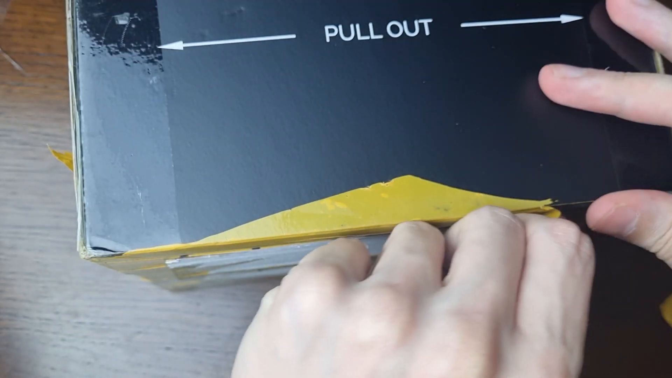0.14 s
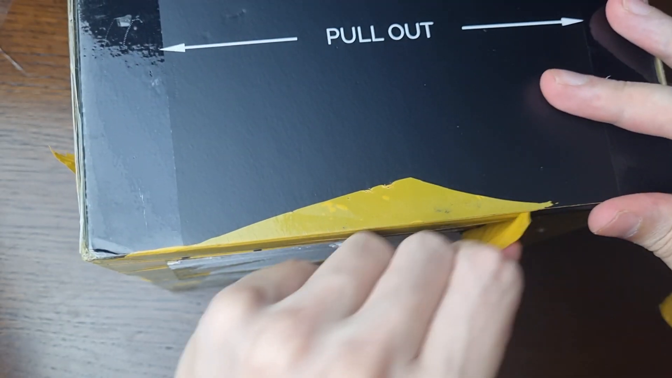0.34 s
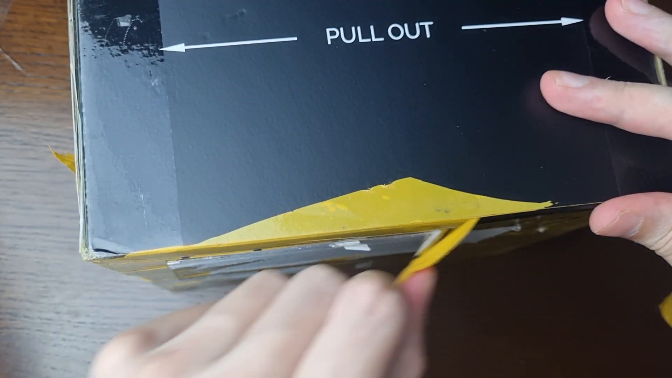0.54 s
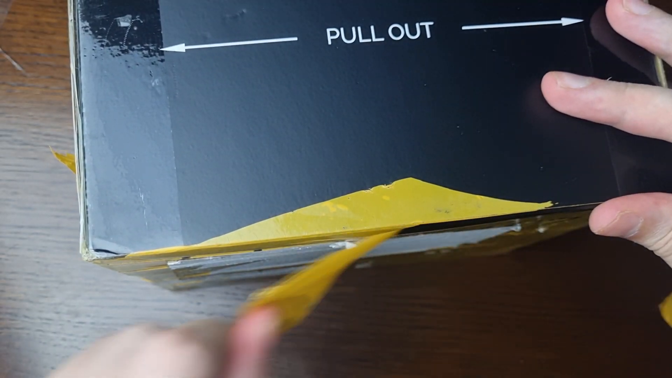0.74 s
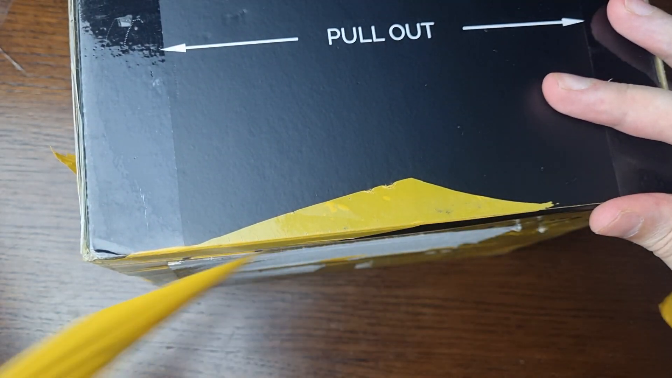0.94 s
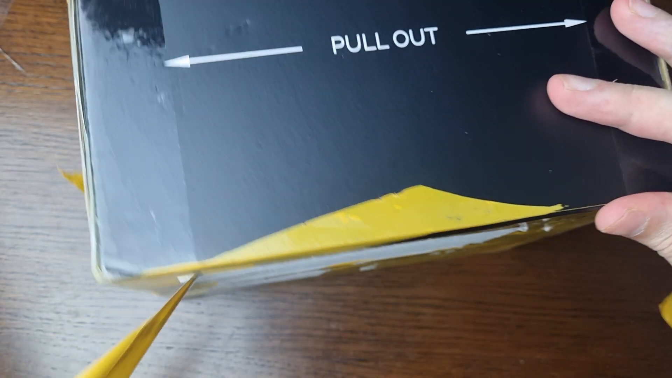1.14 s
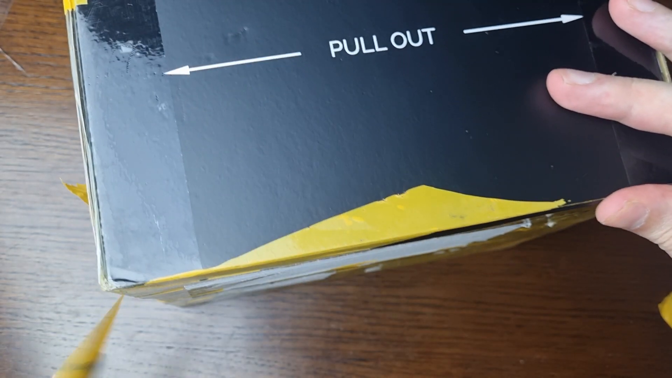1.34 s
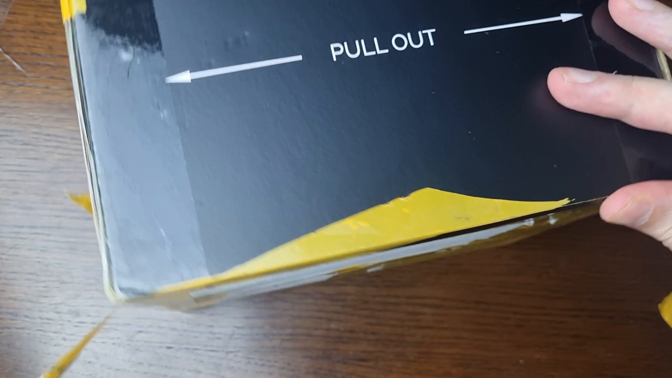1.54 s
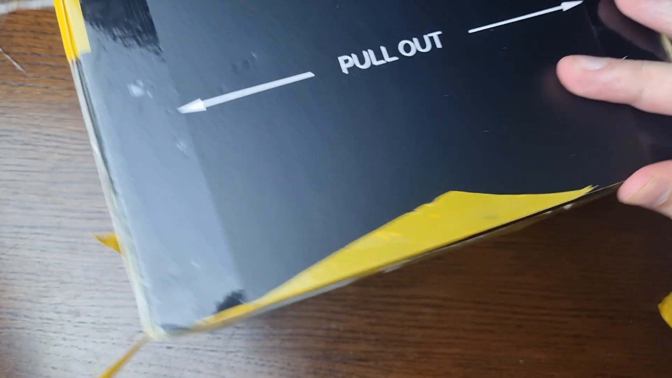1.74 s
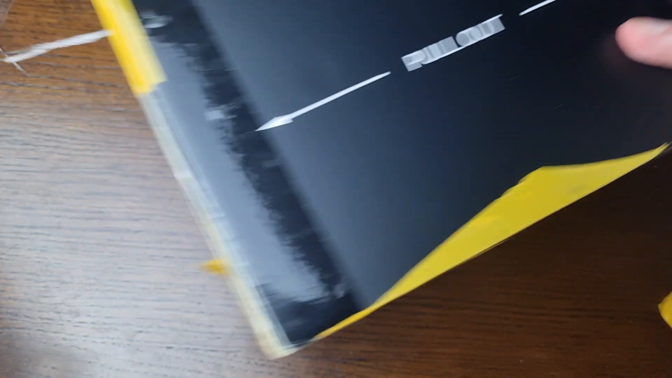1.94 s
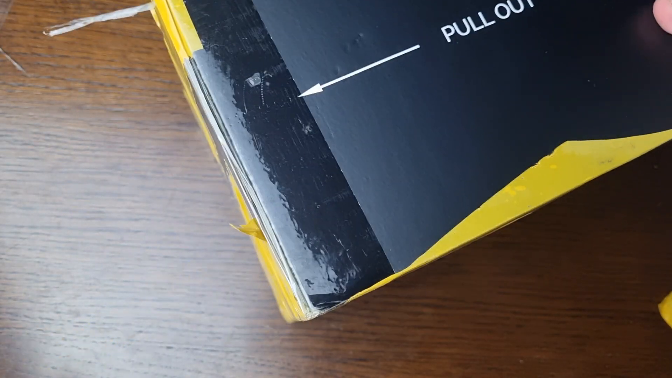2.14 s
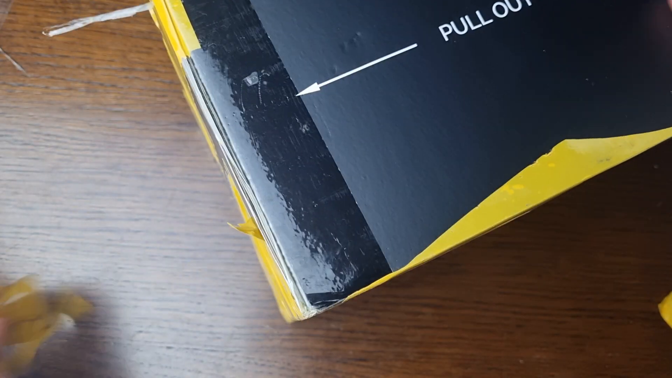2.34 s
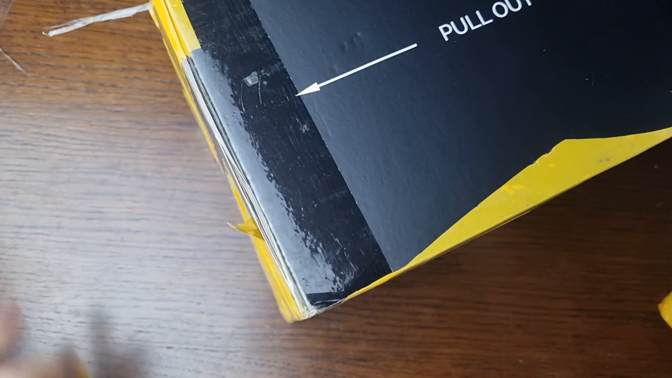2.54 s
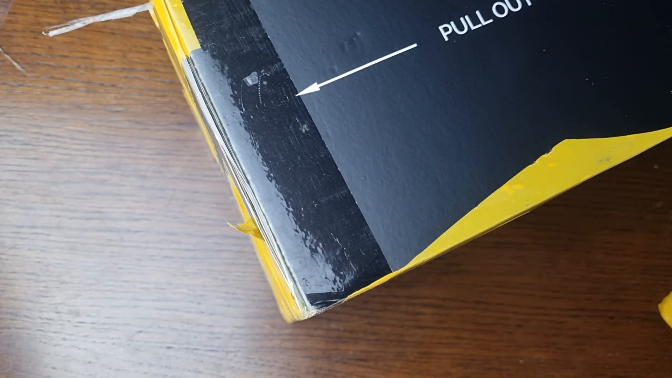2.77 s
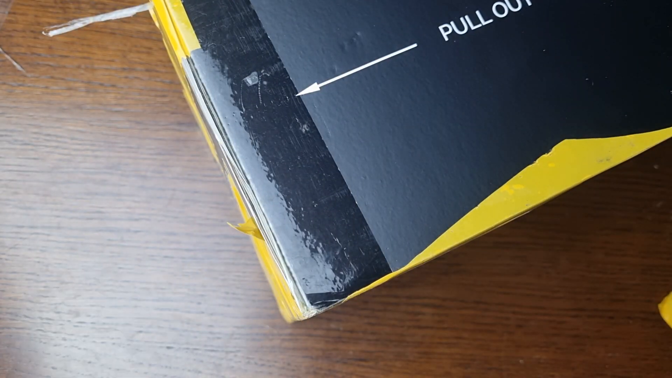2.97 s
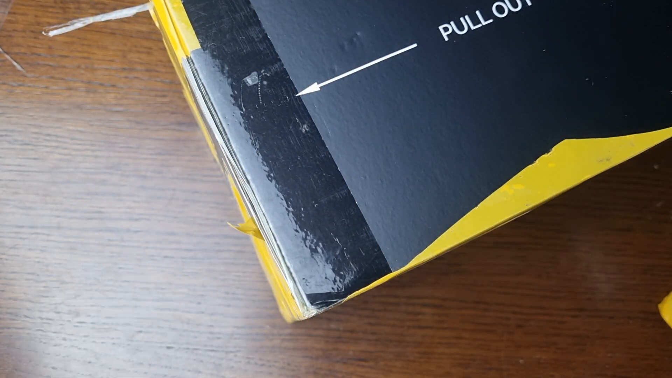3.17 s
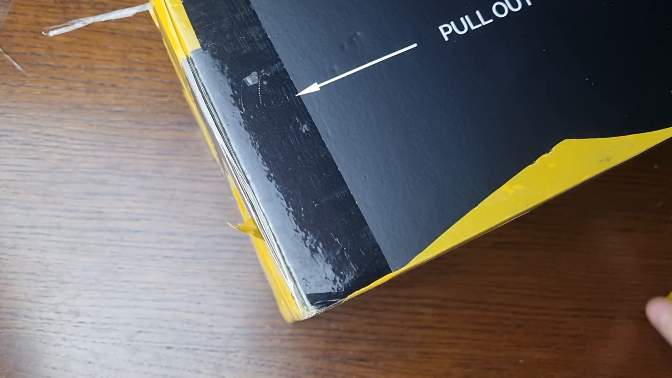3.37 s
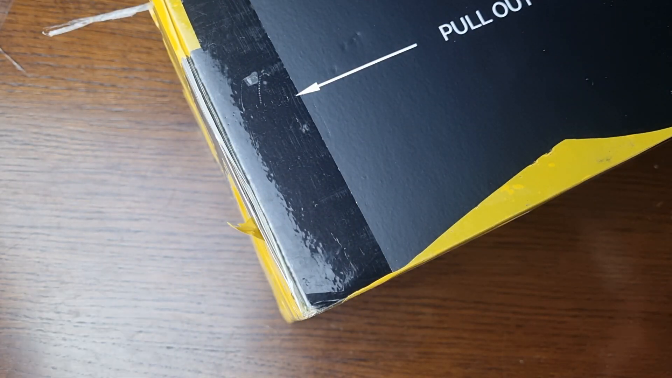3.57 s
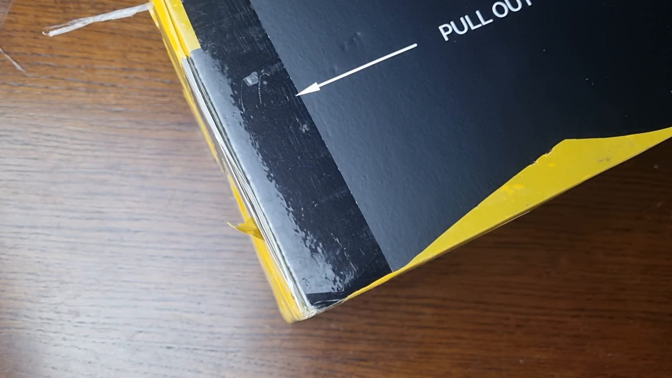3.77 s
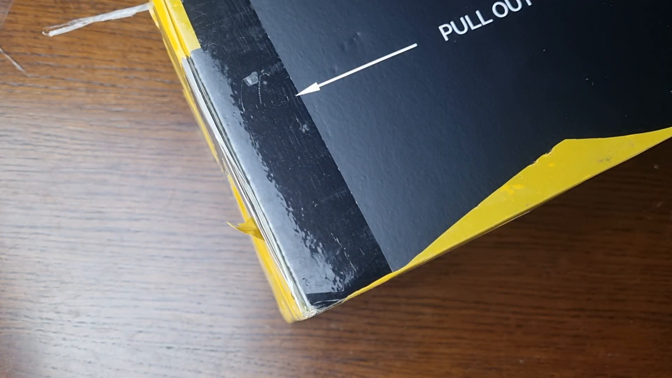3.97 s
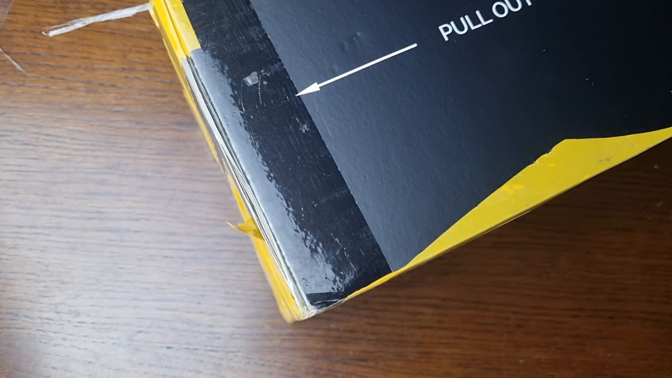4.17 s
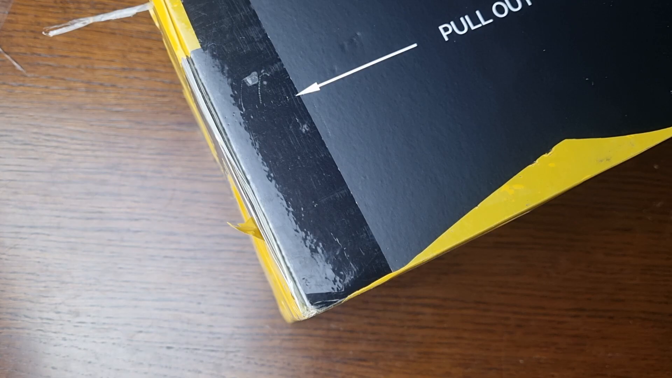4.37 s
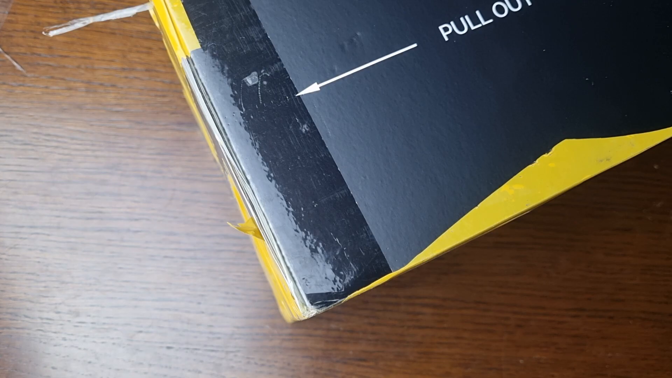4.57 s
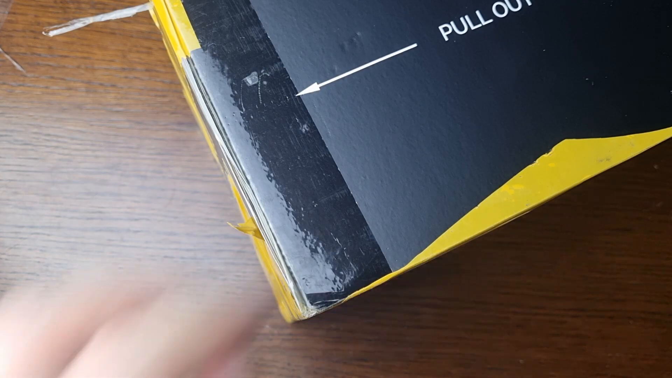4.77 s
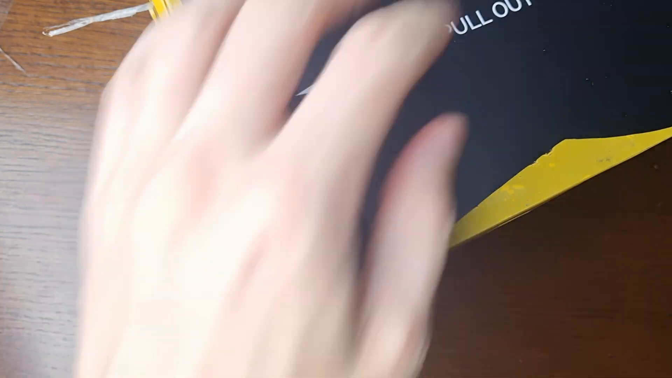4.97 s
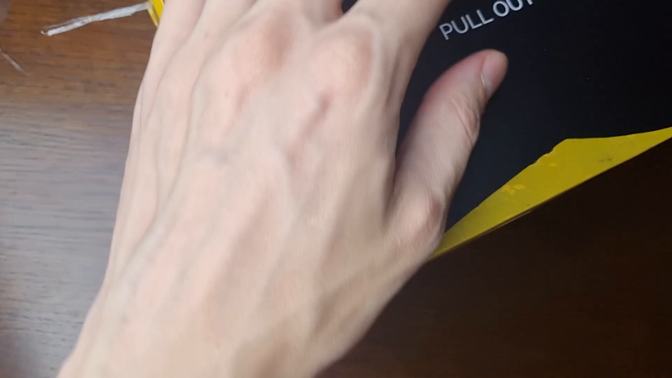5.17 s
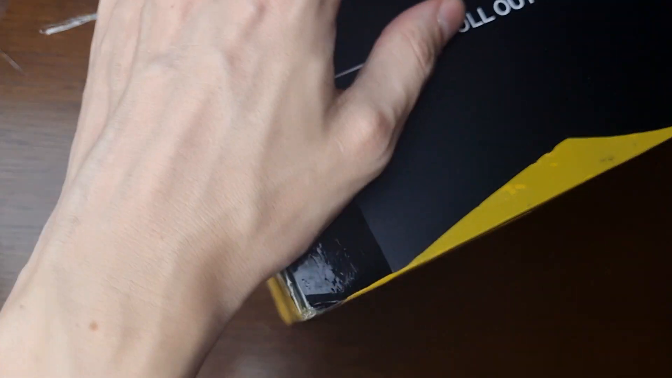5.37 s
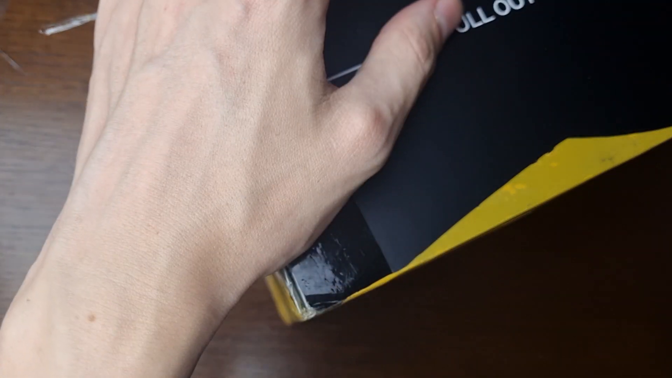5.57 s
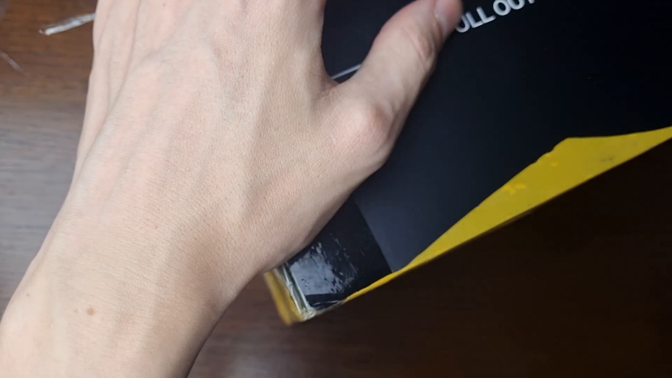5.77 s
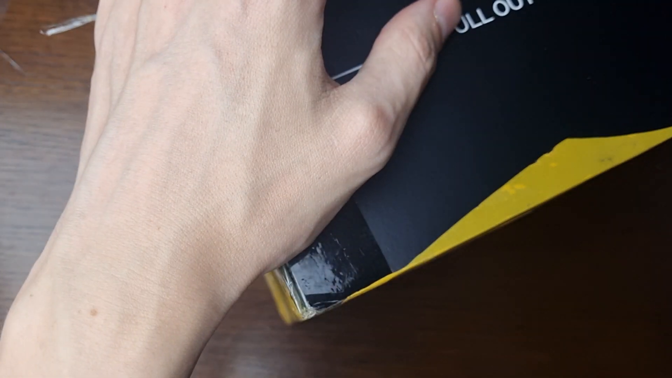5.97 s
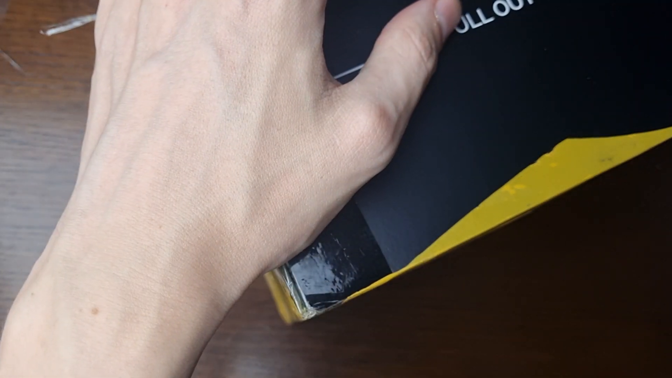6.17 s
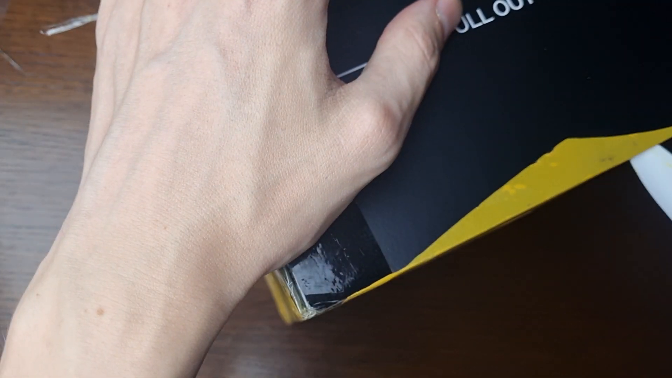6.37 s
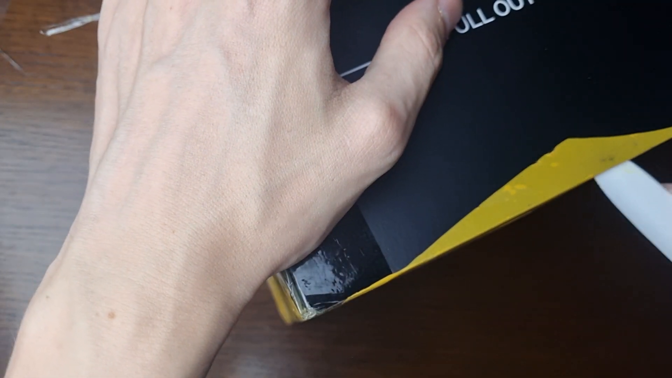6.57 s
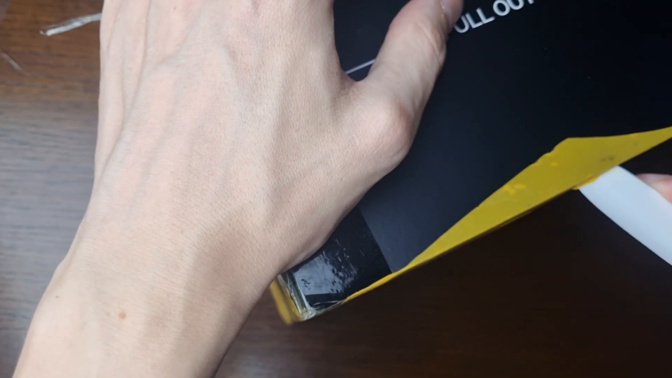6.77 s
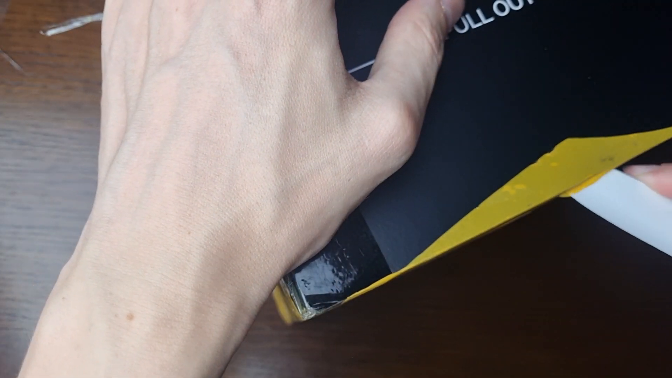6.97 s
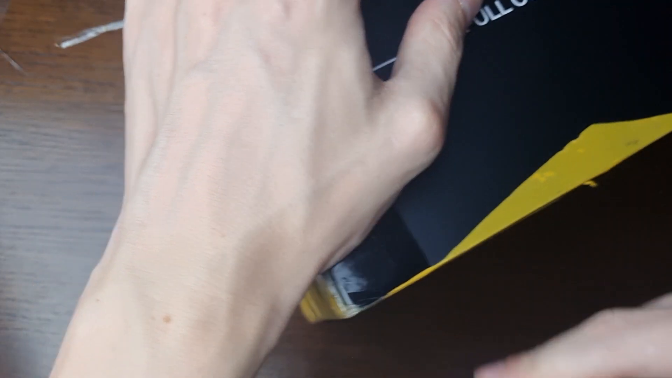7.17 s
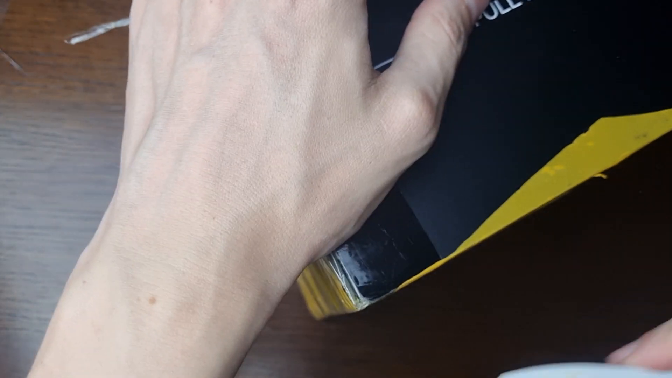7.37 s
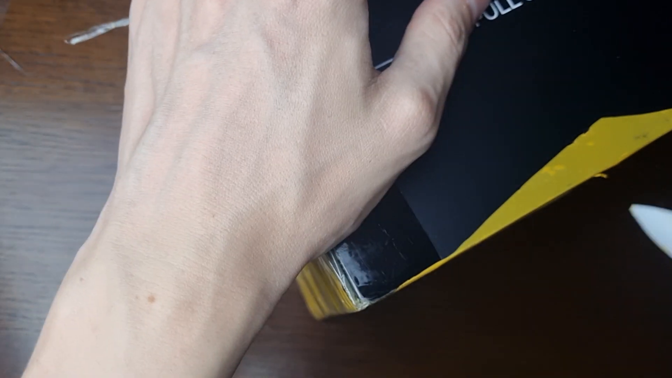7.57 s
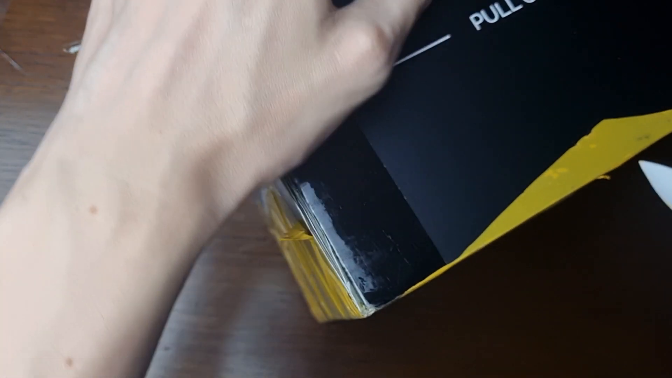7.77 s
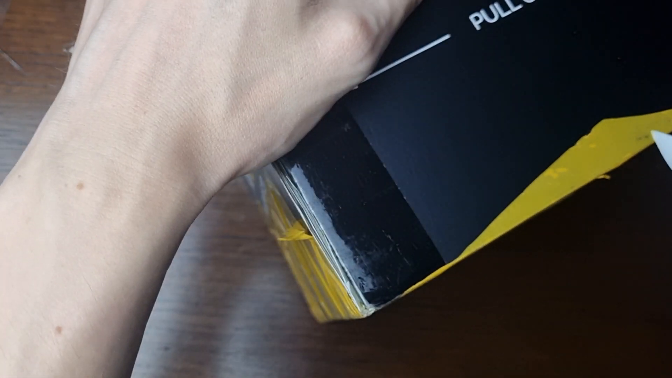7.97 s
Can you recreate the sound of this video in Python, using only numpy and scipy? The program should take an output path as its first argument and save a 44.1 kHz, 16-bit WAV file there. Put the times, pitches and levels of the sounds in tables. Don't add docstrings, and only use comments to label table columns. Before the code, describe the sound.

Very close stereo sound at a wooden desk in a small, quiet room. After a tiny crackle at 0.1 s, tape begins peeling from a hollow cardboard box around 0.25 s: dense hiss, a sharp snap near 0.4, quick stuttering slips at 0.5, and boxy midrange resonance, strongest around 0.8 to 1.0 with a hard crack. The pull eases; isolated snaps come at 1.25, 1.4 and 1.55 to 1.6. At 1.82 to 1.91 the tape rips free in a loud, rapid burst with a low thump. Light crinkles follow from 2.2 to 2.5, with brighter clicks at 3.05 to 3.2 and 3.4. Then near silence, with only faint ticks and soft desk rumble. Around 5.0 to 5.4 a hand slides with a very faint, high squeak and creaks. Soft scraping and dull knocks run from 6.2 to 7.0; a crisp, rising blade cut snaps at 7.12 to 7.15, then faint rustles and bumps until 8.

```python
import sys
import numpy as np
from scipy import signal
from scipy.fft import rfft, irfft, next_fast_len
from scipy.io import wavfile
from scipy.ndimage import uniform_filter1d, map_coordinates

SR = 44100
rng = np.random.default_rng(int(sys.argv[2]) if len(sys.argv) > 2 else 0)


def to_linear_factor(level_db):
    exponent = np.asarray(level_db, float) / 20
    return 10 ** exponent


def generate_wav(sig):
    pcm = np.round(np.clip(np.atleast_2d(sig).T, -1, 1) * 32767).astype(np.int16)
    wavfile.write(sys.argv[1], SR, pcm)


N = 353241

# (frequency [Hz], bandwidth [Hz], level [dB])
BOX_MODES = [(310, 60, 1.5), (553, 140, -3), (923, 110, -3), (1204, 230, -6.5), (1406, 120, -4),
             (1680, 210, -11)]
# (frequency [Hz], level [dB])
FILM_SPECTRUM = [(300, -27), (1200, -10.5), (2200, -2.5), (4400, 1), (7600, 1.5), (11300, -2), (14600, 0.5),
                 (16200, -9)]
# (time [s], delay of the right side [samples], left over right [dB])
HANDS = [(0, -5.5, 1), (0.701, 11.5, -1), (1.299, 10, 2), (1.851, 12, 3.5), (2.301, 11, -0.5),
         (3.2, 9.5, 1), (3.699, -6.5, -4.5), (4.201, -4, -11.5), (5.201, -11, -12), (6.2, 0.5, -2.5),
         (6.598, -2.5, -3), (8, 5.5, -3)]


def evened(x):
    return x / np.sqrt(np.mean(x ** 2) + 1e-20)


def read(points, hz):
    f, value = np.transpose(points)
    return np.interp(np.log(hz + 1), np.log(f + 1), value)


def colour(x, points, tilt_db=0):
    size = next_fast_len(x.shape[-1])
    hz = np.fft.rfftfreq(size, 1 / SR)
    gain = to_linear_factor(read(points, hz) + tilt_db * np.log2((hz + 300) / 5000))
    return irfft(rfft(x, size) * gain, size)[..., :x.shape[-1]]


def resonate(x, hz, width):
    r = np.exp(-np.pi * width / SR)
    return 2 * signal.lfilter([1 - r], [1, -r * np.exp(2j * np.pi * hz / SR)], x).real


def resonate_twice(x, hz, width):
    return resonate(resonate(x, hz, width), hz, width)


def box(x, modes=BOX_MODES):
    return sum((-1) ** k * to_linear_factor(db) * resonate(x, hz, w) for k, (hz, w, db) in enumerate(modes))


def curve(table, column, outside=-120.):
    t, table = np.arange(N) / SR, np.asarray(table)
    out = np.full(N, outside)
    inside = (t >= table[0, 0]) & (t <= table[-1, 0])
    out[inside] = np.interp(t[inside], table[:, 0], table[:, column])
    return uniform_filter1d(out, size=200)


def swells(peak_s, rise_s, fall_s, db, roundness=1):
    t = np.arange(0, N + 32, 32)[:, None] / SR
    rising = (peak_s - t) / np.maximum(rise_s, .003)
    falling = (t - peak_s) / np.maximum(fall_s, .003)
    gains = to_linear_factor(db - 20 * np.maximum(rising, falling) ** roundness)
    return np.interp(np.arange(N) / SR, t[:, 0], np.sqrt((gains ** 2).sum(1)))


def add(mix, s, sound):
    part = mix[..., round(s * SR):][..., :sound.shape[-1]]
    part += sound[..., :part.shape[-1]]


def lean():
    s, _, db = np.transpose(HANDS)
    return to_linear_factor(np.array([[.5], [-.5]]) * np.interp(np.arange(N) / SR, s, db))


def hush():
    # (frequency [Hz], level [dB per Hz])
    air = [(30, 16), (220, -3), (480, -1), (950, -21.5), (1400, -8.5), (2000, -16.5), (8000, -24.5),
           (16000, -21)]
    a, b = rng.standard_normal((2, N))
    return to_linear_factor(-81) * evened(colour(np.array([a, 1.8 * a + 1.5 * b]), [(7.8, -31)] + air))


def room(x):
    # (frequency [Hz], reverberation time t60 [s])
    decay = [(150, .4), (500, .5), (3000, .52), (8000, .44), (15000, .27)]
    taps = np.zeros((2, SR))
    at = np.arange(200, SR - 20, 20) + rng.integers(0, 20, (2, (SR - 201) // 20))
    np.put_along_axis(taps, at, rng.choice([-1., 1.], at.shape), 1)
    hz, t, z = signal.stft(taps, SR, nperseg=256)
    tail = signal.istft(z * to_linear_factor(-60 * t / read(decay, hz)[:, None]), SR, nperseg=256)[1]
    wet = signal.fftconvolve(x[None], tail / np.linalg.norm(tail[0]), axes=1)[:, :N]
    wet = signal.stft(wet, nperseg=256)[2]
    power = uniform_filter1d(abs(wet[:, 12:]) ** 2, size=24, axis=2) + 1e-20
    wet[:, 12:] *= np.sqrt(abs(uniform_filter1d(power, size=13, axis=1) / power))
    return signal.istft(wet, nperseg=256)[1][:, :N]


def rumble(strain):
    # (frequency [Hz], bandwidth [Hz])
    desk = [(66, 20), (97, 9.8), (142, 44), (180, 32)]
    # (peak time [s], length [s], deep level [dB], upper level [dB])
    leans = [(0.074, 0.67, -60, -77), (0.368, 0.3, -50.5, -47.5), (1.166, 0.15, -57, -50.5),
             (1.602, 0.21, -51.5, -58), (1.869, 0.15, -41.5, -40.5), (2.385, 0.45, -66.5, -80),
             (3.04, 0.74, -63, -94), (3.391, 0.18, -47.5, -54), (3.875, 0.32, -64.5, -91.5),
             (4.32, 0.16, -60, -84), (4.762, 0.39, -53.5, -77), (5.15, 0.45, -59, -71.5),
             (5.596, 0.21, -64, -71.5), (6.011, 0.13, -75.5, -59), (6.089, 0.24, -58.5, -70),
             (6.55, 0.64, -72, -69.5), (6.85, 0.21, -58, -72.5), (7.131, 0.15, -61, -49.5),
             (7.67, 0.15, -73, -63), (7.809, 0.099, -68, -64)]
    a, b = rng.standard_normal((2, N))
    push = np.array([a, .9 * a + .4 * b])
    modes = [resonate_twice(push, hz, width) for hz, width in desk]
    steady = [m / np.sqrt(uniform_filter1d(m ** 2, size=3000) + 0.3 * m.var()) for m in modes]
    deep, second, low, upper = steady
    lumps = to_linear_factor(4.5 * evened(uniform_filter1d(uniform_filter1d(a[::-1], size=2500), size=2500)))
    worked = np.minimum(to_linear_factor(-16.5) * strain, to_linear_factor(-51.0))
    s, length, deep_db, upper_db = np.transpose(leans)
    heave, shake = (swells(s, 0.25 * length, 0.56 * length, db, roundness=1.1) for db in (deep_db, upper_db))
    bass = (heave + to_linear_factor(-71.5) * lumps[::-1]) * (deep + to_linear_factor(-13) * second) + worked * second
    return bass + ((shake + to_linear_factor(-77.0)) * lumps + to_linear_factor(-1.5) * worked) * (0.83 * low + upper)


def squeak():
    # (time [s], frequency [Hz], level [dB])
    whistle = [
        (4.94, 11730, -103),
        (5.0, 12400, -78),
        (5.03, 12950, -91),
        (5.07, 12700, -73),
        (5.2, 12500, -86),
        (5.27, 12900, -86),
        (5.31, 13350, -81.5),
        (5.34, 12660, -90.5),
        (5.385, 11050, -91.5),
    ]
    waver = 1 + 0.003 * evened(uniform_filter1d(rng.standard_normal(N), size=150))
    hz = curve(whistle, 1, outside=11200.) * waver
    gain = to_linear_factor(curve(whistle, 2) + [[2], [-3]])
    return np.sqrt(2) * gain * np.sin(2 * np.pi * np.cumsum(hz) / SR)


def creaks():
    # (start time [s], length [s], level [dB])
    palm = [
        (5.047, 0.037, -88.5),
        (5.155, 0.034, -82),
        (5.231, .025, -76),
        (5.252, 0.032, -69.5),
        (5.378, 0.027, -84),
        (5.447, .055, -90),
    ]
    # (frequency [Hz], bandwidth [Hz], level [dB])
    gloss = [(6300, 210, 2.5), (7500, 300, -8), (9000, 230, -1), (10100, 240, 2), (11200, 300, -19),
             (14600, 500, -8)]
    out = np.zeros(N)
    for s, length, db in palm:
        count = round(length * SR)
        drive, favour = rng.standard_normal(count), rng.standard_normal(len(gloss))
        sound = sum(to_linear_factor(mode_db + 2.5 * f) * evened(resonate_twice(drive, hz, w))
                    for (hz, w, mode_db), f in zip(gloss, favour))
        add(out, s, to_linear_factor(db) * evened(sound) * signal.windows.tukey(count, .4))
    return out


def thuds():
    # (time [s], peak level [dB], frequency [Hz], decay time t60 [s])
    blows = [(0.234, -49, 311, 0.44), (1.53, -31, 82.5, 0.096), (1.904, -22, 310, 0.04),
             (2.214, -51.5, 553, 0.33), (2.217, -50.5, 297.6, 0.27), (2.277, -48, 277, 0.065),
             (2.364, -46.5, 225, 0.11), (3.059, -44, 492, 0.038), (3.389, -41.5, 192, 0.079),
             (6.611, -43.5, 407, 0.1), (6.624, -45, 290.4, 0.13), (6.738, -41, 311, 0.096),
             (6.841, -32, 326, 0.067), (7.135, -35.5, 99, 0.13), (3.401, -47, 130, 0.25),
             (6.361, -68, 235.5, 0.58), (7.636, -62, 448, 0.13), (7.759, -64.5, 302, 0.17),
             (7.255, -47, 254.7, 0.11), (7.665, -50.5, 98.6, 0.38), (7.827, -42.5, 93, 0.18)]
    out, t = np.zeros(N), np.arange(8000) / SR
    for s, db, hz, t60 in blows:
        rattle = evened(resonate_twice(rng.standard_normal(len(t)), hz, hz))
        ring = np.sin(2 * np.pi * hz * t) + 0.73 * rattle
        add(out, s, to_linear_factor(db - 60 * t / max(t60, .02)) * ring * (1 - np.exp(-t * hz * 2.9)) ** 2)
    return out


def ticks():
    # (time [s], peak level [dB], frequency [Hz], decay time t60 [s])
    taps = [(0.9629, -21.5, 1180, 0.029), (0.9633, -18.5, 1570, 0.03), (1.56, -29.5, 490, 0.025),
            (1.559, -30.5, 1260, 0.019), (1.611, -33, 440, 0.016), (1.611, -27, 1250, 0.016),
            (7.11, -35, 605, .06), (7.116, -34.5, 920, 0.042), (4.932, -69, 4000, 0.029),
            (1.2334, -19, 1360, 0.024), (2.335, -40, 4900, 0.013), (.123, -42, 2200, .03),
            (1.888, -20.5, 1330, .04), (3.058, -39.5, 5440, 0.013), (3.083, -25.5, 2870, 0.012),
            (3.15, -38, 5400, .02), (3.1596, -24, 5570, 0.012), (3.4055, -19.5, 5300, 0.013),
            (3.506, -45, 5400, .02), (3.538, -47.5, 5190, 0.014), (7.1169, -30, 5390, .012),
            (2.394, -31.5, 2610, .03), (4.4498, -48.5, 5580, 0.032), (4.451, -62.5, 5170, .15),
            (4.93, -64, 1015, 0.032), (4.929, -58.5, 1357, 0.026), (4.931, -63, 2404, .03),
            (6.613, -50.5, 2003, .04), (6.741, -56, 1500, 0.025), (6.843, -45, 2294, 0.036),
            (7.7882, -51, 1254, 0.025), (7.89, -56, 5740, 0.061), (7.906, -56, 5700, 0.027),
            (5.934, -76, 1352, 0.021), (5.934, -72.5, 4840, .02), (6.088, -70.5, 1346, .03)]
    out, t = np.zeros(N), np.arange(4000) / SR
    for s, db, hz, t60 in taps:
        scrape = rng.standard_normal(len(t)) * to_linear_factor(-60 * t / t60) * (1 - np.exp(-t / 0.001))
        tick = resonate_twice(scrape, hz, 0.24 * hz)
        add(out, s, to_linear_factor(db) * tick / np.abs(tick).max())
    return out


def cut():
    # (start [s], length [s], first frequency [Hz], last frequency [Hz], bandwidth [Hz], end level [dB])
    blade = (7.118, .028, 2600, 9500, 2600, -27)
    start, length, from_hz, to_hz, width_hz, db = blade
    out, u = np.zeros(N), np.arange(0, length, 1 / SR) / length
    turn = np.exp(2j * np.pi * np.cumsum(from_hz * (to_hz / from_hz) ** u) / SR)
    a, b = resonate_twice(rng.standard_normal((2, len(u))), 0, width_hz)
    add(out, start, to_linear_factor(db - 10.3 * (1 - u)) * evened((turn * (a + 1j * b)).real))
    return out


def effort():
    # (time [s], pull level [dB], strain on the box over pull [dB])
    peel = [
        (0, -77, -2.5),
        (.055, -77, 11),
        (.174, -60.5, -1.5),
        (.249, -49.5, 1),
        (.369, -47, -12),
        (.511, -46.5, 0),
        (.822, -38.5, 3.5),
        (.94, -44, 12.5),
        (1.115, -57, 14),
        (1.3, -79, 5.5),
    ]
    # (peak time [s], rise [s], fall [s], film level [dB], box over film [dB])
    tugs = [(.128, 0.006, 0.0067, -42, -32), (.97, 0.036, 0.15, -34.5, 8), (1.253, 0.24, 0.077, -43.5, 11),
            (1.411, 0.02, 0.011, -47, 3.5), (1.545, 0.029, 0.12, -62, 13.5),
            (1.616, 0.056, 0.19, -47.5, -24.5), (1.832, 0.013, 0.092, -29, -2),
            (1.888, 0.047, 0.048, -26.5, -3), (1.95, .05, 0.3, -48, -1), (2.399, 0.028, 0.024, -44.5, -4),
            (2.41, 0.088, 0.16, -56.5, -1.5), (2.52, 0.056, .1, -62.5, -11), (2.6, 0.068, 0.084, -62, -15),
            (2.893, 0.084, 0.05, -58.5, -18), (3.049, 0.014, 0.31, -46.5, -34),
            (3.167, 0.11, 0.1, -45, -46), (3.406, 0.046, 0.026, -44.5, -3), (3.514, 0.2, 0.076, -61.5, -13),
            (3.7, 0.35, 0.9, -78.5, -2.5), (4.029, 0.089, 0.19, -77, -21), (4.159, .04, 0.052, -72.5, -25)]
    # (peak time [s], rise [s], fall [s], film level [dB], box over film [dB])
    slides = [(4.935, 0.039, 0.18, -87, 11.5), (5.06, 0.045, 0.14, -86.5, 10.5),
              (5.165, 0.044, 0.048, -83.5, -6.5), (5.26, 0.056, 0.21, -80.5, 4),
              (5.395, 0.1, 0.3, -88, 9.5), (6.2, .015, 0.46, -85.5, -16.5),
              (6.255, 0.016, 0.49, -76.5, -13), (6.336, 0.045, 0.68, -64, -7.5),
              (6.439, 0.15, 0.26, -70, -13), (6.621, 0.1, 0.19, -57.5, -4.5), (6.848, 0.15, 0.16, -70, 14),
              (7.01, 0.055, 0.087, -63.5, 8.5), (7.116, 0.0068, 0.018, -29, -4),
              (7.13, 0.035, 0.029, -47, -0.5), (7.15, 0.028, 0.0042, -27, -28),
              (7.643, 0.019, 0.23, -64.5, -10), (7.8, .2, 0.18, -87.5, 17), (7.9, 0.058, 0.047, -80, -13)]
    pull = to_linear_factor(curve(peel, 1))
    power = np.array([pull, pull * to_linear_factor(-10), pull * to_linear_factor(curve(peel, 2))]) ** 2
    for rows, fizz_db, fizz_share in (tugs, -3.5, 0.3), (slides, 1, 0.53):
        s, rise, fall, db, box_db = np.transpose(rows)
        film = swells(s, rise, fall, db)
        fizz = swells(s, rise, fizz_share * fall, db + fizz_db)
        power += np.array([film, fizz, swells(s, rise, fall, db + box_db)]) ** 2
    return np.sqrt(power)


def slips(per_s, spread_db):
    clump = to_linear_factor(2.6 * evened(uniform_filter1d(rng.standard_normal(N), size=200)))
    size = to_linear_factor(spread_db * np.minimum(rng.exponential(1, N), 4)) * rng.choice([-1, 1], N)
    return evened(size * clump * (rng.random(N) < per_s / SR))


def patchy(x, depth_db, size):
    z = signal.stft(x, nperseg=256)[2]
    field = uniform_filter1d(rng.standard_normal(z.shape[-2:]), size=size, axis=0)
    field = uniform_filter1d(field, size=12, axis=1)
    return signal.istft(z * to_linear_factor(depth_db * evened(field)), nperseg=256)[1][..., :N]


def strokes(film, fizz, strain):
    # (start [s], end [s], frequency [Hz], bandwidth [Hz], level over film [dB])
    rings = [(.7, .83, 4500, 600, -3), (.79, .94, 5000, 800, -4), (1.84, 1.9, 7700, 900, -3),
             (6.17, 6.3, 4900, 400, 5), (6.185, 6.31, 7950, 300, 5), (1.82, 1.925, 1345, 130, 1),
             (5.04, 5.2, 2600, 150, -3), (6.17, 6.5, 4900, 350, -5), (6.19, 6.4, 7950, 250, -6),
             (1.93, 2.03, 1345, 80, -2), (.93, 1.1, 1150, 120, 0), (.78, 1.06, 1700, 250, -3),
             (1.13, 1.3, 1350, 100, 0), (1.01, 1.11, 7500, 700, 0), (1.82, 2.06, 320, 50, 2),
             (2.56, 2.63, 4200, 600, 2), (2.43, 2.5, 1500, 200, 0), (5.24, 5.4, 1900, 200, 0),
             (4.92, 5.5, 1800, 1200, 2), (6.2, 7.1, 6100, 200, -5), (5.05, 6.2, 1448, 69, -5),
             (6.23, 6.56, 1350, 80, -2), (6.3, 6.68, 2450, 220, -2), (6.86, 7.1, 1500, 250, 0),
             (6.85, 7.1, 2350, 470, 0), (7.16, 7.32, 2100, 600, 0), (6.5, 6.85, 1500, 500, 0),
             (7.64, 7.78, 1600, 500, 0), (6.33, 6.6, 600, 500, -3)]
    # (start [s], end [s], frequency [Hz], bandwidth [Hz],
    # level over film [dB])
    walls = [(.12, 0.2, 587, 70, 0), (.23, .3, 590, 80, 6), (.23, 0.29, 880, 90, 1.5),
             (.31, 0.48, 578, 80, 7), (.32, 0.39, 860, 90, -3), (.42, 0.54, 589, 60, 9.5),
             (.51, 0.59, 824, 80, 6.5), (.56, 0.61, 600, 60, 3), (.58, 0.78, 860, 110, 0.5),
             (.49, 0.6, 292, 50, 1.5), (.61, 0.69, 303, 40, 5), (.68, 0.85, 313, 40, 4),
             (.69, 0.72, 560, 70, -0.5), (.78, 0.87, 628, 80, -1), (.88, 1.12, 618, 60, 4),
             (.81, 1.24, 318, 40, 1.5), (.68, 0.85, 1350, 110, 1), (.79, 0.99, 1330, 220, -1.5),
             (1.12, 1.32, 322, 60, 3.5), (.38, 0.92, 593, 112, 1), (0.421, .74, 1157, 500, -3.5)]
    shared, left, right = (slips(9000, 1.8) for _ in range(3))
    pair = shared + 4.2 * np.array([left, right])
    dull = evened(colour(pair, FILM_SPECTRUM, -5.5))
    bright = evened(colour(pair, FILM_SPECTRUM, 3.7))
    hiss = patchy(dull + fizz / (film + 1e-9) * bright, 3.2, size=6)
    for start, end, hz, width, db in rings + walls:
        part = (pair + 7 * shared)[:, round(start * SR):round(end * SR)]
        count = part.shape[1]
        lump = evened(uniform_filter1d(rng.standard_normal(count), size=900))
        gain = to_linear_factor(db + 2 * (lump - lump.mean()) - 3.5) * signal.windows.tukey(count, .5)
        add(hiss, start, gain * evened(resonate_twice(part, hz, 1.5 * width)))
    even_modes = [(hz, 2 * width, 0) for hz, width, _ in BOX_MODES[1:]]
    rubbed = box(box(slips(2500, 2.5), BOX_MODES[1:]), even_modes)
    rubbed = evened(patchy(rubbed, 3, size=2))
    return to_linear_factor(-1.5) * film * hiss * lean() + to_linear_factor(-7.5) * strain * rubbed


def crack(s, peak_db, bright_db, film):
    a, b, ripple = rng.standard_normal((3, 1280))
    a[256] = b[256] = 3.5
    t = np.arange(-256, 1024) / SR
    before = np.exp(-abs(t) / .00015) + .05 * np.exp(-abs(t) / .003)
    after = np.exp(-abs(t) / .0010) + .13 * np.exp(-abs(t) / .006)
    shape = np.where(t < 0, before, after)
    cracks = colour(np.array([a, .7 * a + .7 * b]) * shape, FILM_SPECTRUM, .7 * bright_db)
    cracks = irfft(rfft(cracks) * to_linear_factor(1.8 * evened(uniform_filter1d(ripple[:641], size=14))))
    add(film, s - 256 / SR, to_linear_factor(peak_db + 13.0) * cracks / np.abs(cracks).max(1, keepdims=True))


def snaps():
    # (time [s], peak level [dB], box over peak [dB],
    # high over low [dB])
    breaks = [(0.1205, -38, -24, -4), (0.123, -35, -30, -1), (0.127, -28, -23, -1),
              (0.1322, -35.5, -33.5, -5.5), (0.207, -34.5, -22, 4.5), (0.21, -36, -26.5, -7),
              (0.24, -42.5, 9, -16), (0.2774, -39.5, -8, -2), (0.302, -27.5, -17, 4),
              (0.349, -31.5, -11, 0.5), (0.358, -35, -3, -2), (0.3823, -15.5, -4.5, -1.5),
              (0.4126, -29, -23.5, -1), (0.436, -33, -3, -4), (0.8217, -25.5, -28, -3.5),
              (0.964, -13, -9, 9.5), (0.972, -15, -15, 4), (1.235, -20.5, -1, -2), (1.175, -39, -11.5, 2),
              (1.26, -38, -6, 0), (1.406, -35, -18.5, -0.5), (1.4125, -37, -29.5, 5.5),
              (1.4466, -40.5, -24.5, -3.5), (1.5289, -39, -8, -7.5), (1.5377, -28.5, -12, -1.5),
              (1.562, -17, -19, 1), (1.6123, -15.5, -12.5, -3), (1.74, -48.5, -23.5, 2),
              (7.145, -18.5, -9.5, 5.5), (7.1452, -20.5, -14.5, -11.5)]
    # (time [s], peak level [dB], high over low [dB])
    crinkles = [(2.2169, -45, -16.5), (2.286, -57, -18.5), (2.33, -50.5, -6), (2.337, -51.5, -11),
                (2.365, -41.5, -15.5), (2.3733, -38.5, 11), (2.399, -37, -11.5), (2.425, -40, 3),
                (2.503, -46.5, -6), (2.51, -44, -6), (2.52, -32, -1), (2.6607, -53.5, 5),
                (2.8164, -52.5, -2.5), (2.848, -51.5, 6), (2.8882, -45.5, -10), (3.0351, -46, -11),
                (3.059, -47, -12), (3.078, -35, -3), (3.0841, -29, -7), (3.1002, -37, -7.5),
                (3.107, -26.5, 8.5), (3.13, -39, 0), (3.153, -31.5, -4.5), (3.161, -24.5, 2),
                (3.177, -41.5, -10.5), (3.232, -45, -9), (3.2652, -43, 0.5), (3.351, -48.5, 4.5),
                (3.362, -36, 9), (3.378, -35.5, 2), (3.397, -38.5, 9), (3.407, -21.5, 14), (3.413, -30, 6),
                (3.5059, -45.5, 3.5), (3.539, -46, 11)]
    # (time [s], peak level [dB], high over low [dB])
    pokes = [(3.7455, -56, 2), (4.0282, -52, 4.5), (4.0549, -45.5, 5.5), (4.021, -60.5, -2),
             (4.15, -61.5, 7), (4.1585, -59, 10), (4.166, -63, 2), (4.222, -59, 13), (5.235, -71.5, 0),
             (6.489, -58, -5), (6.631, -49, -16.5), (6.6553, -38, 4.5), (6.7445, -51, -12.5),
             (6.846, -52, -8), (6.8703, -57.5, -16.5), (7.0057, -39.5, -3.5), (7.109, -26.5, 1),
             (7.1166, -29.5, -3), (7.085, -63, -7.5), (7.151, -31, 2.5), (7.301, -53, 4), (7.635, -51.5, 1),
             (7.647, -50, -4.5), (7.662, -61, 9), (7.697, -55.5, 6), (7.789, -60, -30), (7.834, -58.5, -30),
             (7.892, -62, 8), (7.9074, -59.5, 5)]
    # (start [s], end [s], period [s])
    chatter_runs = [
        (.4575, .53, .0286),
        (.5375, .64, .0229),
    ]
    # (time [s], peak level [dB])
    rip_breaks = [(1.823, -13.5), (1.827, -16), (1.8359, -14.5), (1.8397, -14), (1.8457, -15),
                  (1.8465, -13), (1.85, -15.5), (1.853, -15.5), (1.857, -21), (1.865, -13.5),
                  (1.874, -13.5), (1.879, -14), (1.8844, -12), (1.8885, -16), (1.893, -16), (1.899, -14.5),
                  (1.9, -17), (1.905, -16)]
    # (peak level [dB], box over peak [dB], high over low [dB])
    slip = (-25.5, -12.5, 5.6)
    catch = (-25, -11, 3.1)

    film, shove, t = np.zeros((2, N)), np.zeros(N), np.arange(400) / SR
    slip_s = np.concatenate([np.arange(*run) for run in chatter_runs])
    catch_s = np.concatenate([np.arange(*run) + .31 * run[2] for run in chatter_runs])
    chatter = [(s, db - 34 * (s - slip_s[0]), *rest)
               for times, (db, *rest) in ((slip_s, slip), (catch_s, catch)) for s in times]
    rip = [(s, db, -9.5 + 60 * (s - rip_breaks[0][0]), -0.5) for s, db in rip_breaks]
    for s, peak_db, box_db, bright_db in breaks + chatter + rip:
        crack(s, peak_db, bright_db, film)
        push = (1 + rng.standard_normal(len(t))) * np.exp(-t / .00015)
        add(shove, s, to_linear_factor(peak_db + box_db + 5.5) * push / np.linalg.norm(push) / 2.7)
    for s, peak_db, bright_db in crinkles + pokes:
        crack(s, peak_db, bright_db, film)
    return film * lean() + box(shove) / np.abs(box(signal.unit_impulse(800))).max()


def scene():
    # (frequency [Hz], level [dB])
    wall_range = [(1600, 0), (2600, -40)]
    film, fizz, strain = effort()
    near = snaps() + strokes(film, fizz, strain) + thuds() + ticks() + creaks() * lean() + squeak() + cut()
    n, (s, late, _) = np.arange(N), np.transpose(HANDS)
    delay = np.interp(n / SR, s, late)
    body = colour(near[1], wall_range)
    right = sum(map_coordinates(part, [n - share * delay], order=3, mode="nearest")
                for part, share in ((near[1] - body, 1), (body, 0.71)))
    return np.array([near[0], right]) + to_linear_factor(-19.0) * room(near.mean(0)) + rumble(strain) + hush()


def top_cut(x):
    return signal.sosfilt(signal.butter(12, 16970, fs=SR, output="sos"), x)


def record(dry):
    low = signal.butter(3, 45, "high", fs=SR, output="sos")
    top = signal.ellip(8, 1, 40, 16000, fs=SR, output="sos")
    mix = np.tanh(signal.sosfilt(np.vstack([low, top]), dry))
    return top_cut(mix)


dry = scene()
out = record(dry)
generate_wav(out)
```